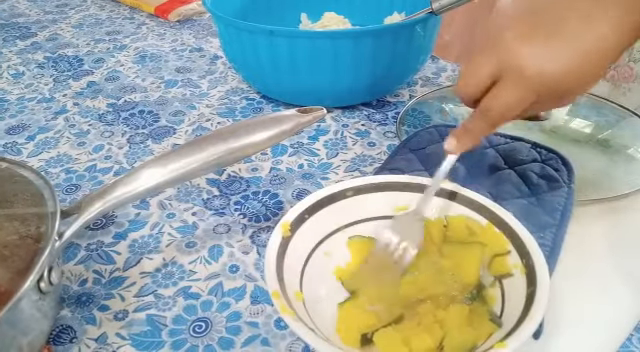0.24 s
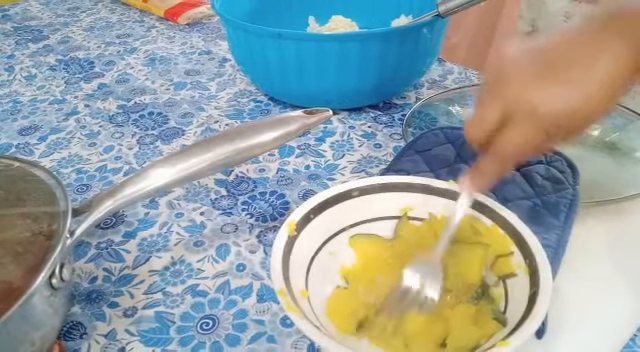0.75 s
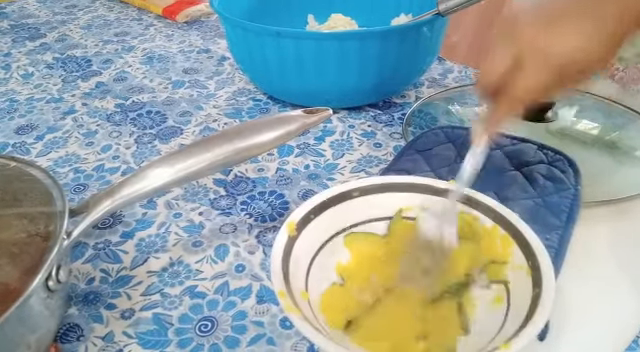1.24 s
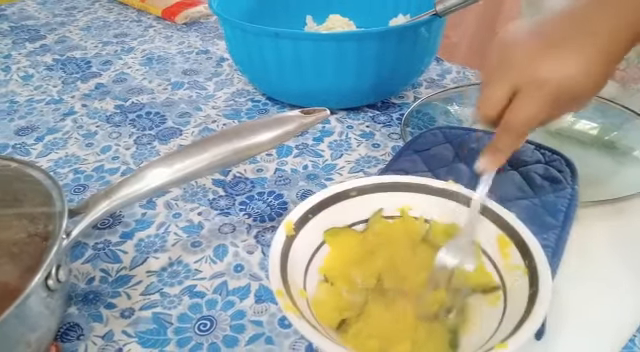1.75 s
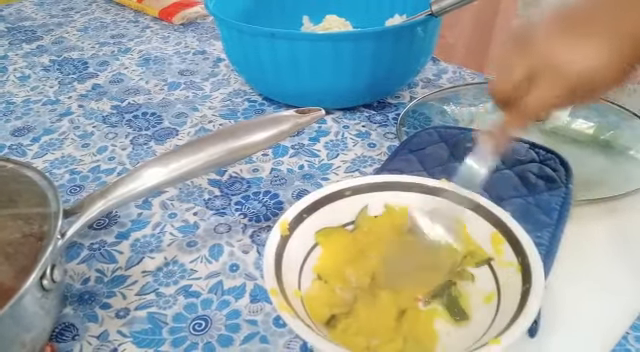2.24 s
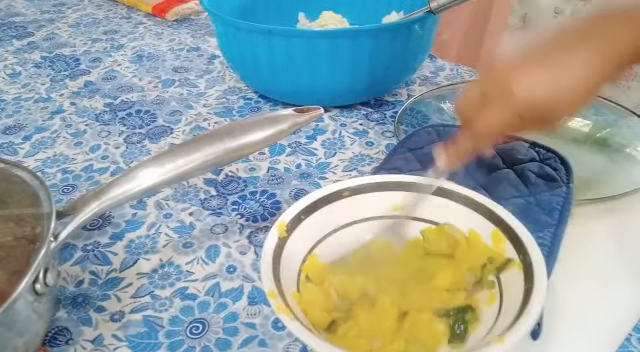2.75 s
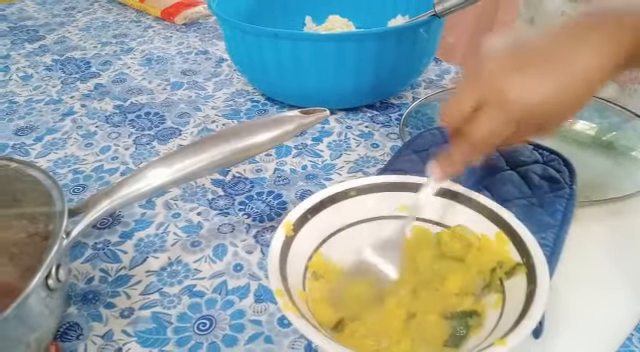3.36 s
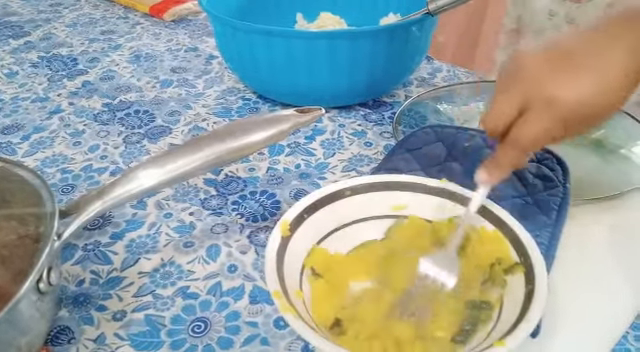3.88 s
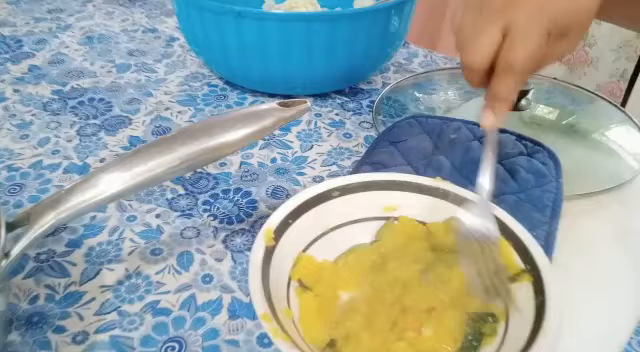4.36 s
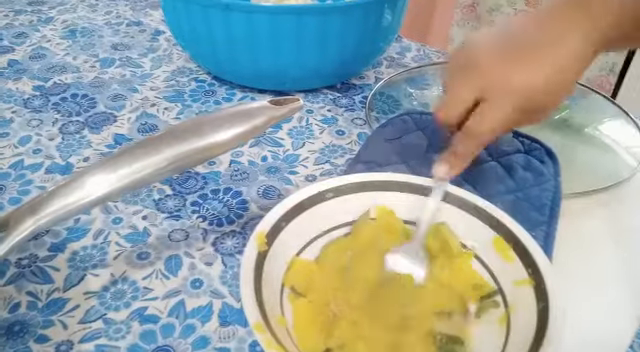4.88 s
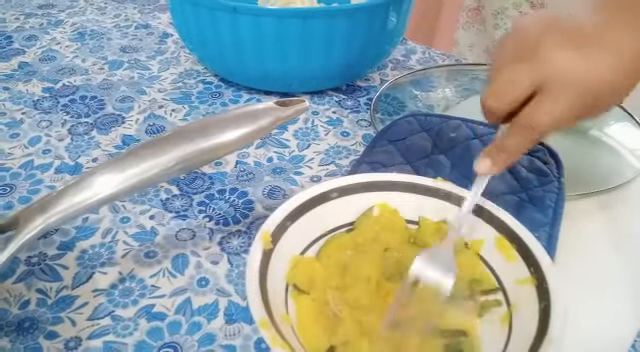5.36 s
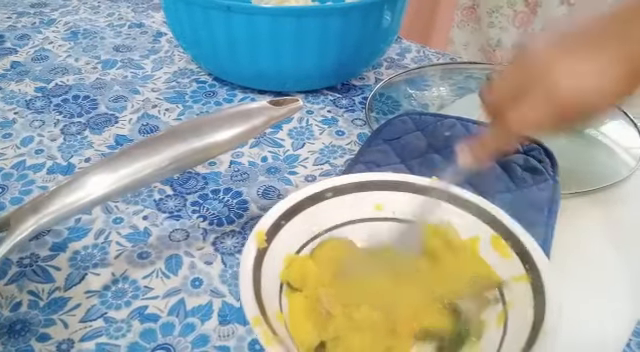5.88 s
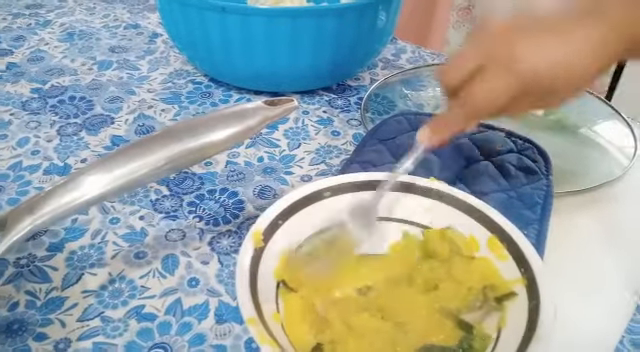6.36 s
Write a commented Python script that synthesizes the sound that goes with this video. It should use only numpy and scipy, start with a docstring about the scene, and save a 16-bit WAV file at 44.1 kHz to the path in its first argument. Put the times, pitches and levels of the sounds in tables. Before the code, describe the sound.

A steel fork works through soft squash in a glazed bowl on a padded cloth. Short bright clicks, some trailed by faint scrapes, mix with dull woody knocks as the bowl rocks. The strongest knocks come early; after a quieter middle, a loud chattering rim rap stands out near the end. Close single microphone in a small kitchen, low unsteady hum and rush, short wall reflections.

```python
"""Mashing squash in a bowl

A steel fork mashes soft squash in a glazed bowl that stands on a padded cloth on a kitchen table.
Tines click on the glaze (struck decaying modes) and scrape along it (noise grains through those modes).
The bowl rocks and knocks the table in bouncing board modes; once the fork raps the rim and chatters.
Behind lies shaped noise: hum, rush and hiss whose level drifts and steps; walls answer every blow."""
import sys
import numpy as np
from scipy import signal
from scipy.fft import rfft, irfft, next_fast_len
from scipy.io import wavfile
from scipy.ndimage import uniform_filter1d

SR = 44100
rng = np.random.default_rng(int(sys.argv[2]) if len(sys.argv) > 2 else 0)


def dump(signal):
    """Clip the signal to [-1, 1] and save it as 16-bit WAV at the path in sys.argv[1]."""
    limited = np.clip(np.atleast_2d(signal).T, -1, 1)
    pcm = np.round(limited * 32767).astype(np.int16)
    wavfile.write(sys.argv[1], SR, pcm)


N = 291485

# tines landing on the glaze: (time [s], level [dB], bowl note [Hz], ring length [factor],
# weight near 1.3 kHz [dB], weight near 2.2 kHz [dB], weight near 5 kHz [dB])
TINE_CLICKS = [(0.43, -28, 1990, 0.92, -17, -1.5, -2), (2.4505, -28, 2277, 1.5, -2, 12, 17.5),
               (2.7814, -41, 2290, 1.7, -12, 2, -14), (2.786, -41, 2100, 0.51, -4, 4, -13),
               (3.4273, -40, 1920, 1.04, -3, 1, 8.5), (3.7634, -55.5, 2000, 1.2, -6, -4, -4),
               (4.806, -55, 2100, 0.98, -30, -34, -29), (5.236, -28.5, 2110, 0.97, -10.5, -0.5, 1),
               (6.1698, -27.5, 2180, 1.38, 3, 6, 13.5)]
# bowl and fork under the tines, relative, at ring length 1: (frequency [Hz], level [dB], t60 [s])
GLAZE_MODES = [(397, -8.5, 0.024), (1270, -0.5, 0.011), (1570, -4.5, 0.05), (2626, -11.5, 0.017),
               (3222, -5, 0.023), (4260, -1, 0.018), (4764, -2, 0.011), (4960, -7.5, 0.006),
               (5970, -6, 0.0092), (6920, -7.5, 0.012), (7690, -14, 0.018), (10590, -17, 0.0086),
               (13400, -19, 0.011), (12520, -16, 0.013), (15200, -17, 0.0088)]
# the bowl note, relative, at ring length 1: (level [dB], t60 [s])
BOWL_NOTE = (-1.5, 0.016)
# tines dragged over the glaze, before the scrape's trim:
# (start [s], swell [s], start level re peak [dB], peak level [dB], t60 of the fade [s])
TINE_DRAGS = [(0.435, .003, -1, -53.5, 0.21), (2.461, 0.03, -28, -42.5, 0.11), (5.245, 0.03, -3, -59, 0.18),
              (5.575, .05, -3, -62, .3), (6.178, 0.014, -5.5, -51.5, 0.21)]
# the fork raps the rim and chatters: (time [s], level [dB])
RIM_RAPS = [(5.5630, -12.5), (5.5655, -15.5), (5.5693, -21), (5.5711, -27), (5.5806, -31)]
# bare rim, relative: (frequency [Hz], level [dB], t60 [s])
RIM_MODES = [(493, -13.5, 0.05), (1070, -15, 0.018), (1405, -6.5, 0.026), (1463, -20.5, 0.046),
             (1714, -3.5, 0.012), (1800, -20.5, 0.028), (2017, -15, 0.022), (2100, -26, 0.065),
             (3240, -17.5, 0.017), (3580, -6, 0.015), (3890, -5, 0.011), (5960, -25, 0.013),
             (7150, -17, 0.016), (9830, -24, 0.006)]
# the bowl's foot lands on the table: (time [s], level [dB], knock pitch [factor], board boom [dB],
# hardness [dB], time to the first bounce [ms], bounce level re landing [dB])
FOOT_KNOCKS = [(0.435, -45, 1.05, 14, 4, 3.2, 0), (0.4709, -20, 1.04, -14.5, 4, 7, -17),
               (0.4785, -33, 1.59, -2, -7, 3.5, -22), (0.561, -53, 1.05, 6, -5, 16, -1),
               (0.757, -47, 0.87, 4, -11, 2.7, -5), (0.7653, -37.5, 1.095, 6, -7, 5.4, 3.5),
               (0.861, -53, 1.3, 11, 5, 3.3, -5), (1.1507, -22, 1.15, -1.5, -1, 3.7, -20),
               (1.154, -19.5, 1.027, -4.5, -27, 3.73, -3), (1.169, -47.5, 1.36, 12, 6, 14.4, -2),
               (1.221, -48, 0.51, -12, -12, 3.1, -9), (2.479, -47.5, 0.91, 7, 26, 2.6, -7),
               (2.798, -49, 0.88, 17, -1, 3.6, -9), (3.419, -55, 0.71, 12, 6, 2, -6),
               (5.243, -44.5, 1.11, 9, 10, 2.56, -13), (5.281, -50, 1.02, -6, -5.5, 3.1, -6),
               (5.307, -42.5, 0.99, 15, -17, 2.6, -8), (5.632, -38, .9, 5, -3.5, 2.6, -13.5),
               (5.6374, -32, 1.104, 3, -13, 4.5, -3), (6.2313, -40, 0.986, -2, -5, 2.9, -13),
               (6.2351, -36.5, 1.03, -6, 17, 5.9, -15.5), (6.274, -59, 0.61, -1, -10, 3.6, -15)]
# table board, relative, at knock pitch 1: (frequency [Hz], level [dB], t60 [s])
BOARD_MODES = [(127, -7, .08), (164.7, -11, 0.094), (181.5, -15.5, 0.075), (274, -11.5, 0.049),
               (396, -20.5, 0.12), (503.5, -5.5, 0.037), (585, 8.5, 0.018), (726, -2, 0.015),
               (832, -21, 0.037), (970, -20.5, 0.016), (1420, -14, 0.02), (1760, -14.5, 0.014)]
# first contact and two bounces, added to each knock:
# (delay [bounce times], level change [dB], boom change [dB], hardness change [dB])
BOUNCE_PATTERN = [(0, -0.5, 4, 4.5), (1.002, -2.5, -2.5, -11), (2.299, -7, 7, -6)]
# level of the background rush, with drifts and sudden steps, before the swells: (time [s], level [dB])
RUSH_LEVEL = [(0, -63), (.39, -64.5), (.96, -67), (1.58, -67), (2.34, -66), (2.6, -63.5), (2.9, -64.5),
              (2.98, -67), (3.52, -66.5), (3.56, -69.5), (3.78, -74.5), (4.42, -73.5), (4.6, -73),
              (4.64, -66.5), (4.85, -67.5), (5.01, -72), (5.38, -69.5), (5.47, -76.5), (5.9, -75.5),
              (6.15, -72.5), (6.5, -71.5), (6.61, -77.5)]
# hum level over the rush, before the swells: (time [s], level [dB])
HUM_OVER_RUSH = [(0, 3.5), (1, 4), (2.5, 2), (3.4, 2.5), (4, 1.5), (5, 2.5), (5.8, 3), (6.61, 1.5)]
# brief rises of the background after some loud blows: (peak time [s], rush rise [dB], hum rise [dB])
BACKGROUND_SWELLS = [(.55, 4, 6), (.88, 4.5, 4.5), (1.21, 8, 4), (5.3, 8, 9), (5.698, 12, 7),
                     (6.33, 3.5, 3)]
# relative spectrum of the hum: (frequency [Hz], density [dB per Hz])
HUM_SPECTRUM = [(15, -56), (25, -28), (86, -4), (162, 0), (245, -3), (324, -1.5), (409, -4), (448, -1.5),
                (1000, -10), (1300, -37.5), (2200, -120)]
# relative spectrum of the rush: (frequency [Hz], density [dB per Hz])
RUSH_SPECTRUM = [(470, -29.5), (800, -15.5), (1090, -1.5), (1220, -2.5), (1890, -4.5), (3280, -6),
                 (3770, -9), (5200, -24.5), (6760, -54), (11400, -120)]
# relative spectrum of the hiss: (frequency [Hz], density [dB per Hz])
HISS_SPECTRUM = [(2820, -24.5), (4800, -17), (5640, -7.5), (6900, 2.5), (8110, -5.5), (14000, -2.5),
                 (15100, -3.5), (16000, -32.5)]
# decay of the kitchen walls' answer: (frequency [Hz], t60 [s])
WALL_DECAY = [(120, 0.28), (500, 0.19), (2000, 0.21), (6000, 0.17), (14000, 0.022)]
# gentle treble roll-off of the microphone: (frequency [Hz], gain [dB])
MIC_ROLL_OFF = [(6000, 0), (8000, -2.5), (9200, -3), (10500, -4), (14000, -5.5)]

RING_DB, TINE_DB = -8.5, -3  # weights of the modes near 1.6 and 4.6 kHz
TOP_FOLLOWS = 0.41  # share of the 2.2 kHz weight that reaches the top modes, near 7 kHz and above
HARD_CONTACT_MS, HARD_LANDING_DB = 0.9, -20  # contact time of a landing at this level
SOFTER_PER_DB = 0.045  # weaker landings sink into the padding longer: log contact time per dB
HARDER_PER_DB = 2.04  # a stronger bounce is harder: dB of hardness per dB of level
SWELL_RISE_S, SWELL_FALL_S = 0.1, 0.082
HISS_DB, USUAL_RUSH_DB = -83.5, -68  # hiss level when the rush is at its usual level
HISS_FOLLOWS = 0.8  # the hiss swings less than the rush
TOP_HZ = 15900  # band limit


def amp(db):
    """Gain of a level in dB."""
    return 10 ** (np.asarray(db) / 20)


def unit(x):
    """x at rms 1."""
    return x / np.sqrt(np.mean(x ** 2) + 1e-20)


def along(points, hz):
    """Reads (frequency [Hz], value) points on a log frequency axis."""
    f, v = np.transpose(points)
    return np.interp(np.log(hz + 1), np.log(f + 1), v)


def filtered(x, response):
    """Shapes x with a complex response of frequency."""
    m = next_fast_len(N + 8192)
    return irfft(rfft(x, m) * response(np.fft.rfftfreq(m, 1 / SR)), m)[:N]


def ring(modes, colour, contact, crack_db, dull):
    """Decaying modes at peak 1 plus a broad crack; a longer contact (in s) eases the onset."""
    t = np.arange(SR // 4) / SR
    hz, db, t60 = np.transpose(modes)[:, :, None]
    chance = rng.standard_normal((2, len(modes), 1))
    level = db + along(colour, hz) + 1.5 * chance[0] - 60 * t / t60
    rise = 1 - np.exp(-t / contact)
    partials = amp(level) * np.sin(2 * np.pi * hz * t + 0.3 * chance[1])
    body = -partials.sum(axis=0) * rise
    pole = [1, -np.clip(dull, 0, 0.97)]  # a padded contact smooths the crack
    grit = unit(signal.lfilter([1, -1], np.convolve(pole, pole), rng.standard_normal(len(t))))
    crack = amp(crack_db - 60 * t / 0.015) * rise * grit
    return body / np.abs(body).max() + crack


def add(track, s, blow, wet_db):
    """Lays a blow at time s with its own answer from the walls: noise that decays by frequency."""
    hz, t, z = signal.stft(rng.standard_normal(SR // 2), SR, nperseg=256)
    decay = amp(-60 * t / along(WALL_DECAY, hz)[:, None])
    tail = signal.istft(z * decay, SR, nperseg=256)[1]
    walls = np.pad(tail / np.linalg.norm(tail), (330, 0))  # the answer starts a few ms late
    echo = signal.fftconvolve(blow, walls)
    start = round(s * SR)
    track[start:][:len(blow)] += blow
    track[start:][:len(echo)] += amp(wet_db) * echo


def tines():
    """Tines land as a grainy crack over the briefly ringing glaze; mash on the spot shortens the ring."""
    track = np.zeros(N + SR)
    for s, db, note_hz, length, low_db, body_db, bright_db in TINE_CLICKS:
        top_db = TOP_FOLLOWS * body_db
        colour = [(1300, low_db), (1570, RING_DB), (2350, body_db), (3250, 0),
                  (4640, TINE_DB), (4860, bright_db), (6900, top_db)]
        bowl = GLAZE_MODES + [(note_hz, *BOWL_NOTE)]
        modes = [(hz, level, t60 * length) for hz, level, t60 in bowl]
        blow = ring(modes, colour, 0.00043 * length, crack_db=top_db - 15.5, dull=0.11)
        add(track, s, amp(db) * blow, wet_db=-11.0)
    return track[:N]


def scrape():
    """Steel chatters over the glaze: dense uneven grains feed the bowl's modes, damped by the mash."""
    t, drag = np.arange(N) / SR, np.zeros(N)
    for s, swell, start_db, db, t60 in TINE_DRAGS:
        contour = np.interp(t - s, [0, swell, swell + 2 * t60], [start_db, 0, -2 * 60])
        drag += (t > s) * amp(db + contour)
    grains = rng.standard_normal(N)
    unevenness = uniform_filter1d(rng.standard_normal(N), size=90) * np.sqrt(90)  # wanders over 2 ms
    grains = grains * amp(1.8 * unevenness)
    modes = GLAZE_MODES + [(2140, 3, BOWL_NOTE[1])]
    width_hz = 250  # one damped width for all modes

    def glaze(f):
        """Broad resonances of alternating sign, tilted up, over a faint floor above 1 kHz."""
        total = 0
        for k, (hz, db, _) in enumerate(modes):
            gain = (-1) ** k * amp(db + 5.9 * np.log2(hz / 4000))
            damping = 1j * f * width_hz
            total = total + gain * damping / (hz * hz - f * f + damping)
        return total + amp(-22.0) * (f > 1000)

    smooth_drag = uniform_filter1d(drag, size=132)  # 3 ms
    return amp(-2.0) * smooth_drag * unit(filtered(grains, glaze))


def rim():
    """The bare rim, free of mash, rings in its own modes under a chatter of raps."""
    track = np.zeros(N + SR)
    for s, db in RIM_RAPS:
        blow = ring(RIM_MODES, [(500, 0)], contact=0.0004, crack_db=-16.0, dull=0.74)
        add(track, s, amp(db) * blow, wet_db=-12.5)
    return track[:N]


def table():
    """Padded knocks that bounce twice: the board booms, a harder landing wakes the upper modes."""
    track = np.zeros(N + SR)
    for s, db, pitch, boom_db, hard_db, bounce_ms, bounce_db in FOOT_KNOCKS:
        modes = [(hz * pitch, level, t60) for hz, level, t60 in BOARD_MODES]
        for delay, change_db, more_boom_db, harder_db in BOUNCE_PATTERN:
            peak_db = db + change_db + bounce_db * (delay > 0)
            hardness_db = hard_db + harder_db + HARDER_PER_DB * (peak_db - db)
            contact = HARD_CONTACT_MS / 1000 * np.exp(SOFTER_PER_DB * (HARD_LANDING_DB - peak_db))
            colour = [(125, boom_db + more_boom_db), (450, 0), (900, 0.007), (1850, hardness_db)]
            blow = ring(modes, colour, contact, crack_db=hardness_db - 32.5, dull=0.93)
            add(track, s + delay * bounce_ms / 1000, amp(peak_db) * blow, wet_db=-13.0)
    return track[:N]


def background():
    """Three background noise bands with a shared level curve, raised briefly after some loud blows."""
    t = np.arange(N) / SR
    rush_db = np.interp(t, *np.transpose(RUSH_LEVEL))
    hum_db = rush_db + np.interp(t, *np.transpose(HUM_OVER_RUSH))
    for s, rush_swell_db, hum_swell_db in BACKGROUND_SWELLS:
        swell = np.interp(t, [s - SWELL_RISE_S, s, s + SWELL_FALL_S], [0, 1, 0])
        rush_db = rush_db + rush_swell_db * swell
        hum_db = hum_db + hum_swell_db * swell
    hiss_db = HISS_DB + HISS_FOLLOWS * (rush_db - USUAL_RUSH_DB)
    hum = amp(hum_db) * air(HUM_SPECTRUM, patchy_db=1.5)
    rush = amp(rush_db) * air(RUSH_SPECTRUM, patchy_db=1.86)
    hiss = amp(hiss_db) * air(HISS_SPECTRUM, patchy_db=3.0)
    return hum + rush + hiss


def air(spectrum, patchy_db):
    """Coloured noise of rms 1 whose gain varies in random patches of time and frequency."""
    z = signal.stft(rng.standard_normal(N), nperseg=512)[2]
    field = uniform_filter1d(rng.standard_normal(z.shape), size=5, axis=0)
    field = uniform_filter1d(field, size=10, axis=1)
    noise = signal.istft(z * amp(patchy_db * unit(field)), nperseg=512)[1][:N]
    return unit(filtered(noise, lambda hz: amp(along(spectrum, hz))))


def scene():
    """Bowl and board are too small to send out deep bass; the background joins them in one channel."""
    small = signal.butter(3, 70, "high", fs=SR, output="sos")
    blows = tines() + scrape() + rim() + table()
    return (signal.sosfilt(small, blows) + background())[None]


def record(dry):
    """The microphone rolls off the treble; nothing is kept above the band limit."""
    return filtered(dry[0], lambda hz: amp(along(MIC_ROLL_OFF, hz)) * (hz < TOP_HZ))[None]


dry = scene()
out = record(dry)
dump(out)
```